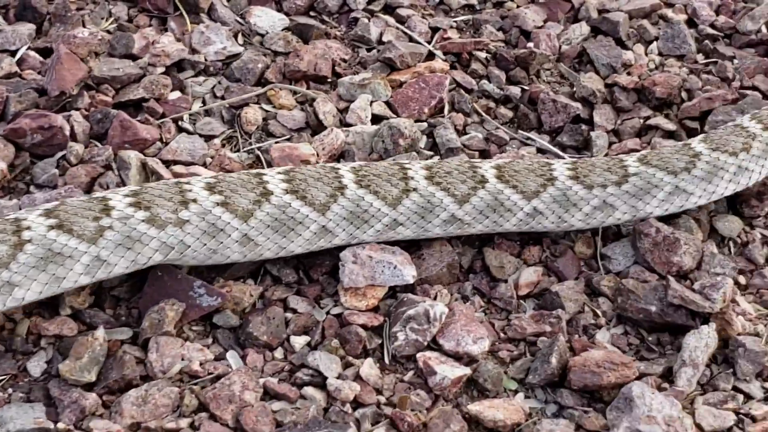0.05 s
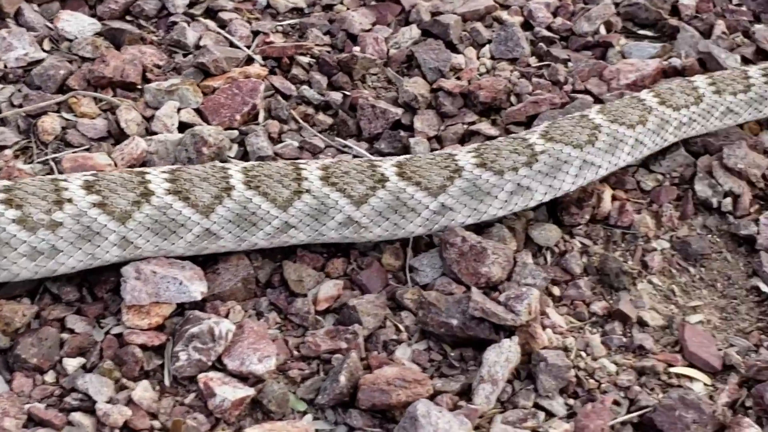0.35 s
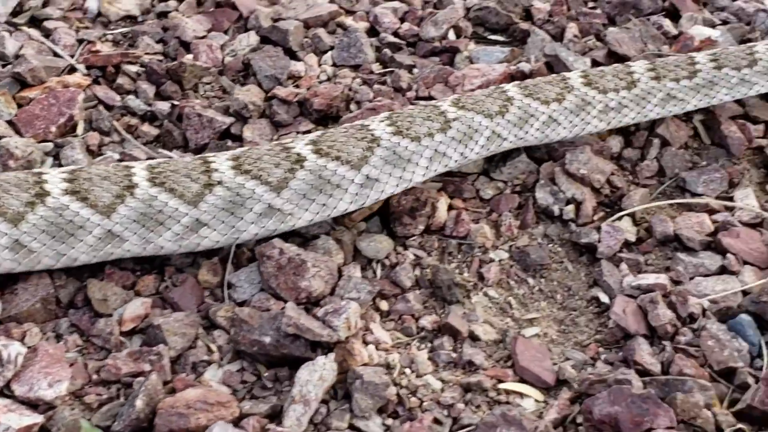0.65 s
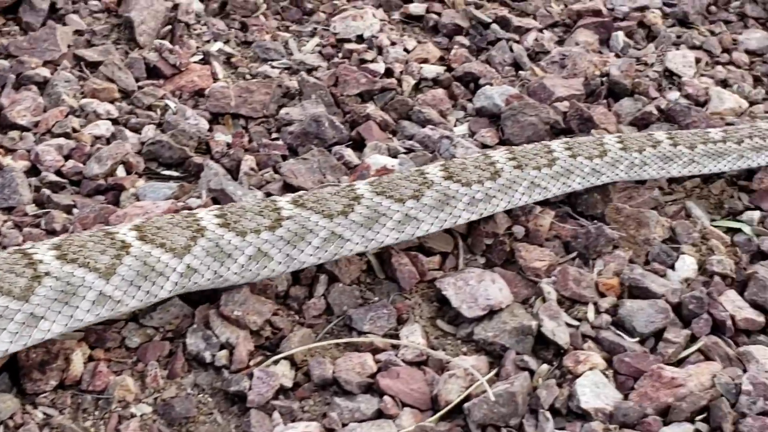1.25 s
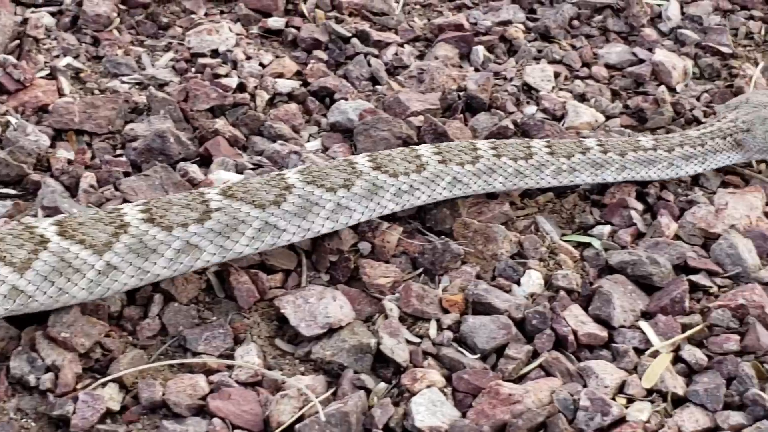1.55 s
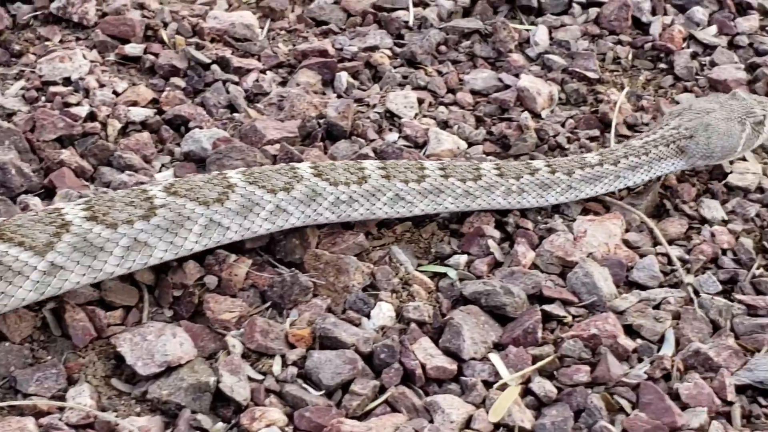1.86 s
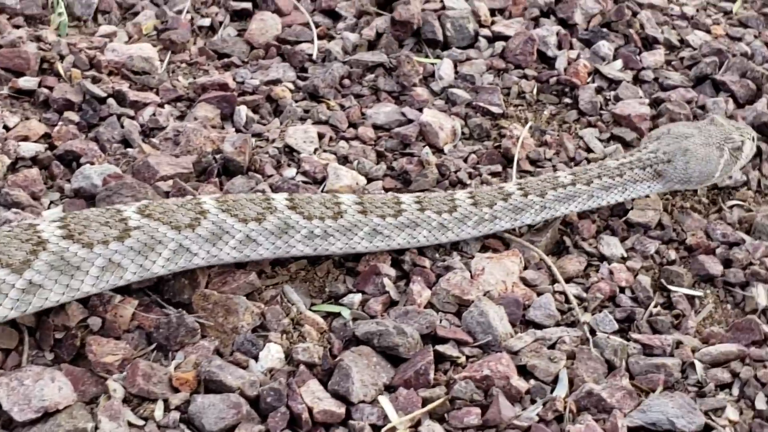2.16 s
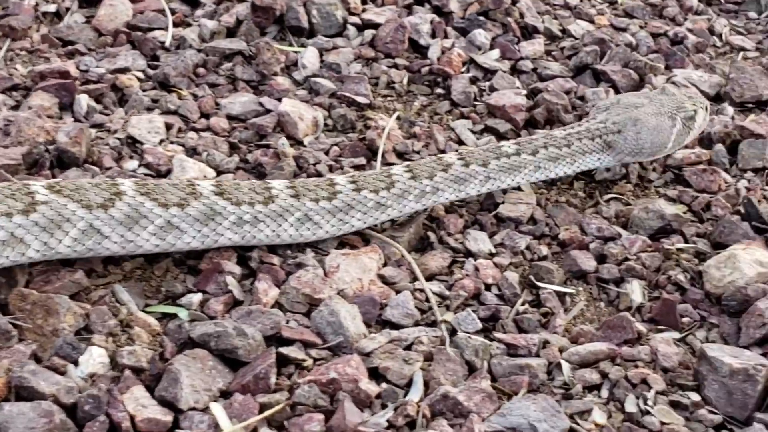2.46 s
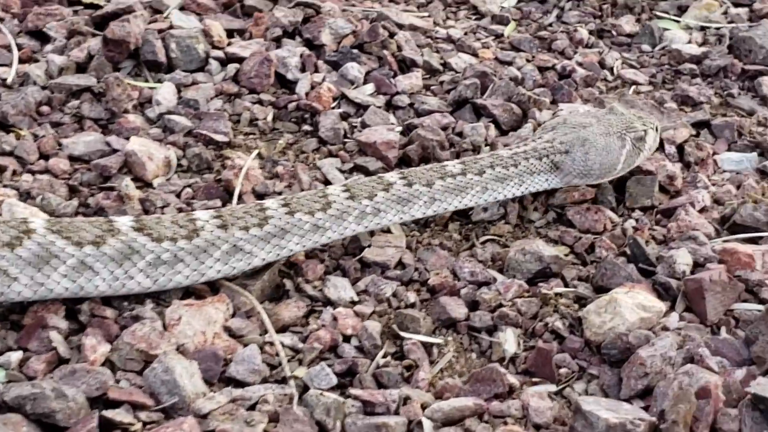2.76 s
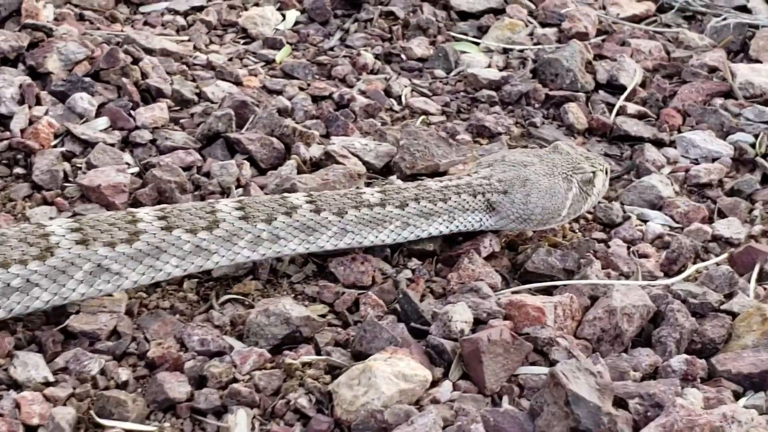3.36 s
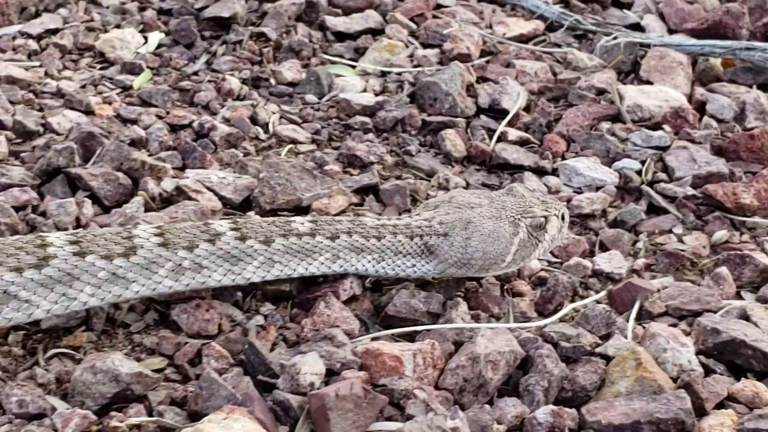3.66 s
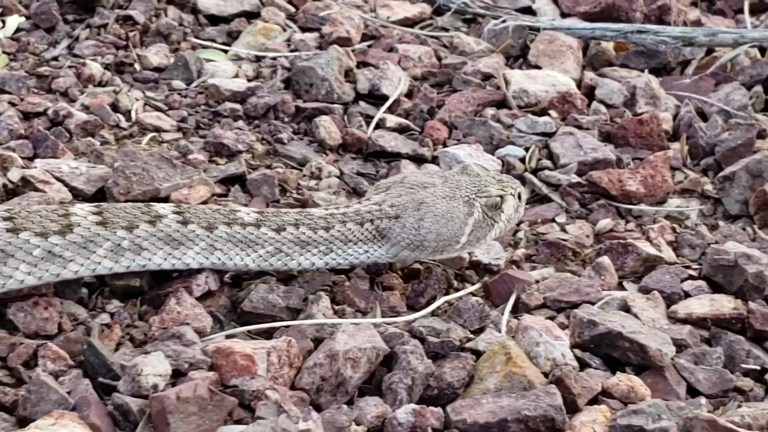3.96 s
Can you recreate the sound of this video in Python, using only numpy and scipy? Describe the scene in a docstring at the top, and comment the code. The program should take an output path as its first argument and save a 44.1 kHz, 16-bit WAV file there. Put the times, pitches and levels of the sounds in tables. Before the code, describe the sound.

Gravel rustles and clicks under a crawling snake over a far engine's low hum.

```python
"""Rattlesnake on gravel

A rattlesnake crawls close to the microphone: its scales rub the loose stones, grit ticks and
fizzes, and tipped pebbles knock dryly. Behind it a distant engine drones and sinks in pitch
over a low rumble and outdoor hiss. Near the end a small bird calls three times."""
import sys
import numpy as np
from scipy import signal
from scipy.fft import rfft, irfft
from scipy.io import wavfile
from scipy.ndimage import uniform_filter1d, map_coordinates

SR = 44100
rng = np.random.default_rng(int(sys.argv[2]) if len(sys.argv) > 2 else 0)


def store_wav(level_fs):
    """Save 16-bit WAV to argv[1]."""
    pcm = np.round(np.clip(np.atleast_2d(level_fs), -1, 1) * 32767)
    wavfile.write(sys.argv[1], SR, pcm.T.astype(np.int16))


N = 176400


def undb(db):
    """Decibels to gain."""
    return 10 ** (np.asarray(db) / 20)


def curve(rows, col=1):
    """A column of a time table, sample by sample."""
    rows = np.array(rows)
    return np.interp(np.arange(N) / SR, rows[:, 0], rows[:, col])


def spectrum(points, size):
    """Decibels at each frequency bin."""
    hz, db = np.array(points).T
    return np.interp(np.log(np.arange(size // 2 + 1) * SR / size + 1), np.log(hz), db)


def colour(x, points):
    """Filter by a spectrum, then scale to unit RMS."""
    y = irfft(rfft(x) * undb(spectrum(points, N)), N)
    return y / np.sqrt(np.mean(y ** 2))


def noise(points, channels=2):
    """Coloured noise, independent per channel."""
    return colour(rng.standard_normal((channels, N)), points)


def wander(rate_hz):
    """Smooth random motion with unit spread."""
    hold = int(SR / rate_hz)
    steps = rng.standard_normal(4096)[np.arange(N) // hold]
    smooth = uniform_filter1d(uniform_filter1d(steps, hold), hold)
    return smooth / smooth.std()


def impulse_response(db):
    """Minimum-phase response with this spectral shape, peak 1."""
    cepstrum = irfft(db * np.log(10) / 20)
    half = len(cepstrum) // 2
    cepstrum[1:half] *= 2
    cepstrum[half + 1:] = 0
    response = irfft(np.exp(rfft(cepstrum)))
    return response / abs(response).max()


def add(out, start_s, x):
    """Mix a sound in at a time."""
    i = int(start_s * SR)
    out[..., i:i + x.shape[-1]] += x[..., :N - i]


def delay(x, seconds):
    """Circular delay, finer than one sample."""
    hz = np.arange(N // 2 + 1) * SR / N
    return irfft(rfft(x) * np.exp(-2j * np.pi * hz * seconds), N)


# Each row: time in seconds, crawl effort in dB.
CRAWL_EFFORT = [(0,-60.5),(.35,-59),(.55,-61),(.8,-65),(.94,-58.5),(1.04,-61.5),(1.33,-59.5),(1.74,-59),(2.02,-56),(2.16,-62.5),(2.28,-54.5),(2.42,-62),(2.5,-67),(3.55,-72),(3.63,-61),(3.82,-64)]
# Each row: frequency in Hz, relative density in dB.
RUB_SPECTRUM = [(300,-15.5),(800,1),(1700,-2.5),(2100,-5.5),(2800,-7.5),(3800,-5.5),(6000,-13),(8500,-19),(15000,-27.5)]


def scales(rub_db=-2.4, easy_crawl_db=-58, grain_sizes=7, grains_per_s=65):
    """The belly rubs on stone; grains tick under it, each size at its own pitch."""
    grit = 0
    for hz in np.geomspace(900, 6000, grain_sizes):
        hits = rng.random(N) < grains_per_s / SR
        strength = undb(3.6 * np.minimum(rng.exponential(size=N), 3.5)) * rng.choice([-1, 1], N)
        grit = grit + signal.lfilter(*signal.iirpeak(hz, Q=4, fs=SR), hits * strength)
    effort_db = curve(CRAWL_EFFORT)
    grit_db = -3.6 + .45 * (effort_db - easy_crawl_db)  # a harder push shifts more grit
    gain = undb(effort_db + wander(23.85))
    return gain * (undb(rub_db) * noise(RUB_SPECTRUM) + undb(grit_db) * colour(grit, RUB_SPECTRUM))


# Each row: time in seconds, firing rate in Hz.
FIRING_RATE = [(0.15, 71.56), (1.23, 70.71), (3.95, 66.85)]
# Each entry: multiple of the firing rate.
HARMONICS = [1,2,3,4,5,6,8,10,12]
# Each row: time in seconds, then the level in dB of each of HARMONICS.
HARMONIC_LEVELS = [(0,-57,-52,-45,-57.5,-76,-79,-63.5,-78,-71),(.9,-47,-46.5,-47.5,-57,-79,-78,-82,-88,-87),(1.55,-57.5,-41,-41,-57,-67,-70,-69.5,-73,-87),(2.2,-51,-43.5,-45.5,-47,-58.5,-53.5,-60.5,-67,-88),(2.7,-63,-46,-46.5,-46,-55,-52.5,-61,-81,-81),(3.4,-48,-44,-49,-42.5,-68.5,-52.5,-68,-69,-79),(3.85,-50.5,-50,-44.5,-37.5,-60,-49,-52.5,-59,-66.5)]


def engine(rate_waver=.0015, waver_db=.9):
    """A far engine's harmonics swell and fade as it moves."""
    firing_hz = curve(FIRING_RATE) * (1 + rate_waver * wander(8.96))
    phase = 2 * np.pi * np.cumsum(firing_hz) / SR
    drone = 0
    for col, multiple in enumerate(HARMONICS, start=1):
        gain = undb(curve(HARMONIC_LEVELS, col) + waver_db * wander(7.07))
        drone += gain * np.sin(multiple * phase + 2 * np.pi * rng.random())
    return np.sqrt(2) * drone


# Each row: frequency in Hz, relative density in dB.
RUMBLE_SPECTRUM = [(20,-30),(38,-12),(55,-9.5),(76,2),(95,-5),(118,-2),(170,-8),(240,-8.5),(470,-19.5),(620,-22),(800,-39.5),(2500,-77)]
# Each row: time in seconds, level in dB.
RUMBLE_LEVEL = [(0,-46),(1.2,-45.5),(2.2,-42.5),(3.2,-43.5),(4,-43)]


def rumble(side_db=-23):
    """Low distant rumble, nearly the same on both sides."""
    centre = noise(RUMBLE_SPECTRUM, channels=1)
    return undb(curve(RUMBLE_LEVEL)) * (centre + undb(side_db) * noise(RUMBLE_SPECTRUM))


# Each row: frequency in Hz, relative density in dB.
AIR_SPECTRUM = [(500,8.5),(900,7),(1350,-3.5),(1750,-2.5),(2450,-1),(3250,-2),(4100,-7.5),(5600,-10),(7500,-21.5),(15000,-54)]
# Each row: time in seconds, reflection delay in seconds.
GROUND_DELAY = [(.2,.00039),(1.5,.00042),(2.6,.00048),(3.1,.00048),(3.4,.00039),(4,.00036)]


def air(direct_db=-58.5, swell_db=.5, ground_db=-6):
    """Outdoor hiss, hollowed by a ground reflection whose delay shifts as the microphone moves."""
    direct = noise(AIR_SPECTRUM) * undb(direct_db + swell_db * wander(4))
    late = np.arange(N) - curve(GROUND_DELAY) * SR
    reflected = np.array([map_coordinates(side, [late], order=1, mode="mirror") for side in direct])
    return direct + undb(ground_db) * reflected


# Each row: start in seconds, relative level in dB, tilt in dB per octave, upper edge in Hz.
PEBBLE_KNOCKS = [(0.061,-37.5,-16,2500),(0.077,-37,-4,3400),(0.28,-44,-8,3500),(0.541,-43,0,4000),(.896,-44,4,12000),(.932,-41.5,3,8000),(.955,-44,-11,2000),(1.072,-33.5,7.5,3000),(1.158,-40,1.5,6540),(1.266,-41,-4,1800),(1.4117,-26.5,1,4415),(1.5038,-39.5,-1,2800),(1.5982,-31,17,8030),(1.6225,-35,8,4530),(1.6594,-36.5,-0.5,3600),(1.6803,-39,19,6800),(1.7049,-33,6,2800),(1.7126,-37.5,1,2500),(1.72,-35.5,20,6850),(1.721,-35,-8,2500),(1.7726,-35.5,3,7030),(1.8371,-39.5,5,2000),(1.851,-36,3,2580),(1.936,-27.5,5.5,5430),(1.9588,-34,2,2796),(1.9791,-17,0.5,3800),(2.048,-41,8,6000),(2.100,-31.5,4.5,7000),(2.2086,-32,0.5,7620),(2.242,-30,1.5,7000),(2.2662,-13.5,-1.6,9200),(2.3824,-30.5,-2,7015),(2.414,-38,16,4430),(2.773,-42,6,4260),(2.819,-40,12,7340),(3.6783,-37.5,20,6450),(3.7137,-29,-1,4030),(3.722,-34,18,3900),(3.8098,-29.5,3,3770)]
# Each row: frequency in Hz, relative gain in dB.
PEBBLE_SPECTRUM = [(200,-49),(540,-22),(780,-2.5),(1050,0),(1350,-6),(1640,-4),(1900,-5.5),(2400,-7),(3600,-14),(5800,-20),(8500,-25.5),(15000,-15.5)]


def pebbles(rise_s=.0032, settle_s=.0045, snap_db=-20, ripple_db=2.6, mode_spacing_hz=300):
    """Each dry knock has a brief noisy rise, one damped pulse and a short settling tail."""
    size, lead = 4096, 512
    out = np.zeros((2, N))
    t = (np.arange(size) - lead) / SR
    hz = np.arange(size // 2 + 1) * SR / size
    envelope = np.exp(-abs(t) / np.where(t < 0, rise_s, settle_s))
    for start_s, level_db, tilt, edge_hz in PEBBLE_KNOCKS:
        tilt_db = tilt * np.log2(np.clip(hz, 700, 5500))  # softer contact cuts the treble
        edge_db = 20 * np.log10(1 / (1 + (hz / edge_hz) ** 9) + undb(snap_db))
        modes_db = ripple_db * np.interp(hz / mode_spacing_hz, np.arange(size), rng.standard_normal(size))
        octaves_off_ring = np.log2((hz + 1) / (.774 * edge_hz))
        ring_db = 2 / (1 + (octaves_off_ring / .059) ** 2)
        stone = impulse_response(spectrum(PEBBLE_SPECTRUM, size) + tilt_db + edge_db + modes_db + ring_db)
        noise_db = -7 - .17 * (level_db + 35)  # hard knocks are cleaner
        drive = rng.standard_normal((2, size)) * envelope
        drive *= undb(noise_db) / np.sqrt(np.sum(drive ** 2) / 2)
        drive[:, lead] += 1  # the main pulse
        knock = signal.fftconvolve(drive, stone[None], axes=1)
        add(out, start_s + t[0], undb(level_db - .5) * knock)
    return out


# Each row: centre in seconds, Gaussian width in seconds, level in dB.
FIZZ_SWELLS = [(.07,.04,-77),(.94,.06,-77),(1.8,.2,-78),(1.99,.06,-76),(2.302,.03,-65.5),(2.39,.06,-75)]
# Each row: frequency in Hz, relative density in dB.
FIZZ_SPECTRUM = [(3000,-25),(6000,-4),(14000,0)]


def fizz(flicker_db=2):
    """Fine, gritty high hiss in brief swells."""
    t = np.arange(N) / SR
    swell = sum(undb(db) * np.exp(-.5 * ((t - at) / width) ** 2) for at, width, db in FIZZ_SWELLS)
    return noise(FIZZ_SPECTRUM) * swell * undb(flicker_db * wander(400))


# Each row: start in seconds, length in seconds, top fundamental in Hz, relative level in dB.
BIRD_CALLS = [(3.266,.066,1530,-65.5),(3.575,.086,1570,-65),(3.868,.094,1670,-69)]
# Each row: fraction of the call, fraction of the top fundamental.
CALL_CONTOUR = [(0,.84),(.35,.94),(.68,1),(.82,.99),(1,.89)]
# Each row: multiple of the fundamental, relative level in dB.
CALL_HARMONICS = [(2,-7),(3,0),(4,-8)]


def bird(jitter=.012, flutter_db=2):
    """Thin, slightly rough calls that climb, then drop at the end."""
    out = np.zeros(N)
    for start_s, length_s, top_hz, level_db in BIRD_CALLS:
        n = int(length_s * SR)
        progress = np.linspace(0, 1, n)
        contour = np.interp(progress, *np.array(CALL_CONTOUR).T)
        pitch_hz = top_hz * contour * (1 + jitter * wander(600)[:n])
        phase = 2 * np.pi * np.cumsum(pitch_hz) / SR
        voice = sum(undb(db + flutter_db * wander(120)[:n]) * np.sin(multiple * phase)
                    for multiple, db in CALL_HARMONICS)
        add(out, start_s, undb(level_db + 4) * voice * np.sin(np.pi * progress ** 1.2))
    return out


# Each row: frequency in Hz, left gain relative to right in dB.
LEFT_SHADE = [(700,-1.5),(1100,-2.5),(1700,-4),(2400,-9.5),(4400,-12.5),(6500,-14),(9000,-2),(15000,-1.5)]


def scene(left_lag_s=.00003, engine_lead_s=.00013, engine_left_db=-1.6):
    """Gravel, bird and air are shaded and late on the left; the engine reaches the left first."""
    left, right = pebbles() + scales() + bird() + air()
    shaded = irfft(rfft(left) * undb(spectrum(LEFT_SHADE, N)), N)
    drone = engine()
    left = delay(shaded, left_lag_s) + undb(engine_left_db) * drone
    right += map_coordinates(drone, [np.arange(N) - engine_lead_s * SR], mode="mirror")
    return np.array([left, right]) + rumble() + fizz()


# Each row: frequency in Hz, relative density in dB.
MIC_HISS_SPECTRUM = [(1000,0.84),(6000,-0.78),(8500,-3.3),(12000,1),(15500,0.7)]


def record(dry, hiss_db=-74.5, cutoff_hz=15800):
    """Microphone hiss and a steep top cut."""
    lowpass = signal.ellip(10, .2, 70, cutoff_hz, fs=SR, output="sos")
    return signal.sosfilt(lowpass, dry + undb(hiss_db) * noise(MIC_HISS_SPECTRUM))


dry = scene()
out = record(dry)
store_wav(out)
```